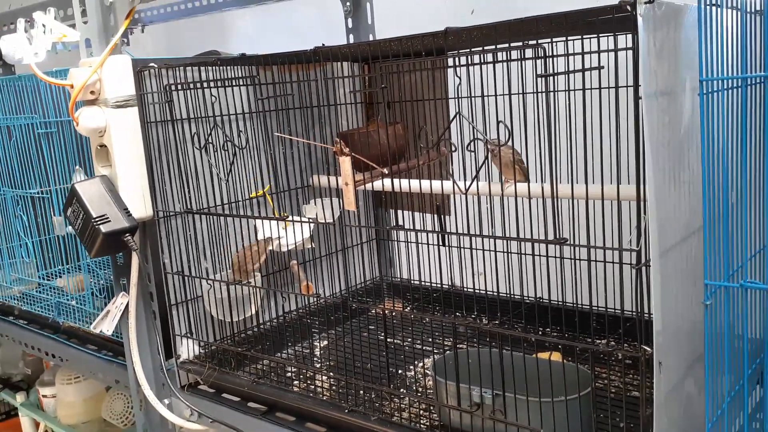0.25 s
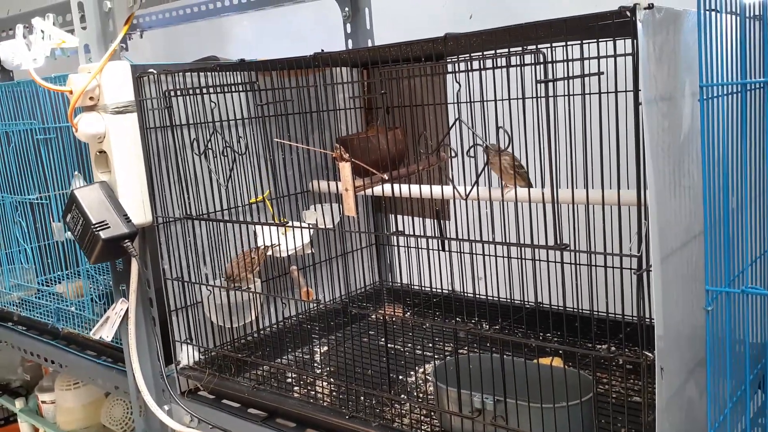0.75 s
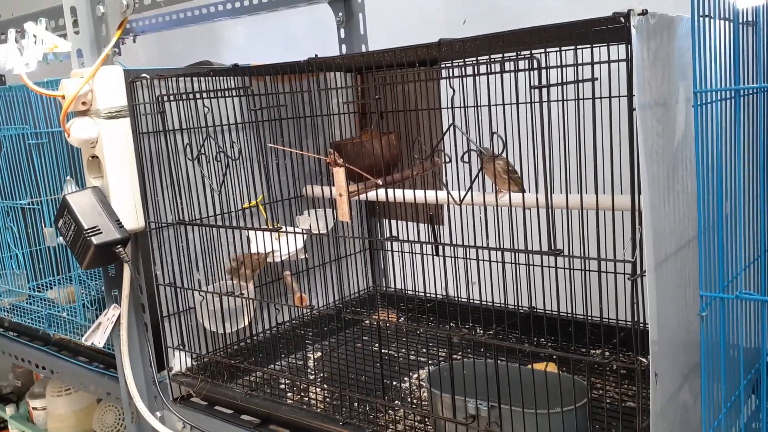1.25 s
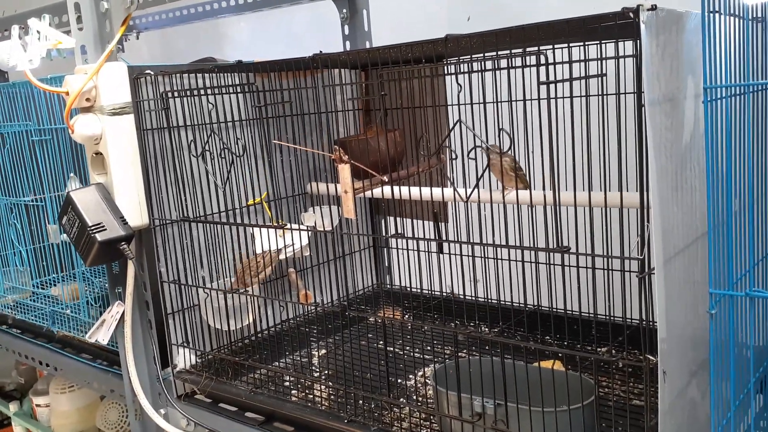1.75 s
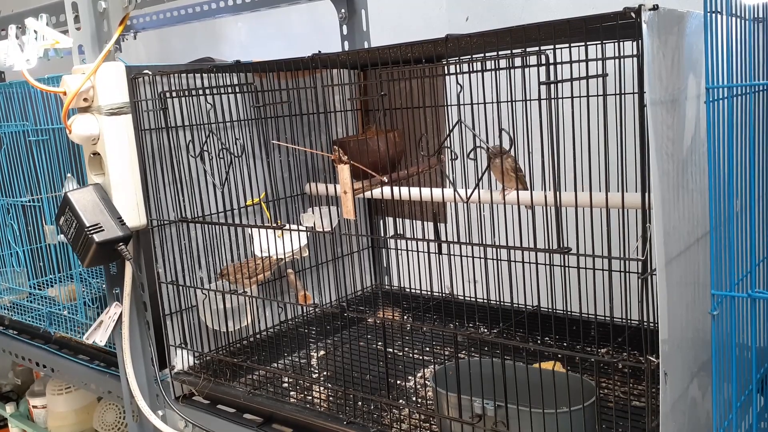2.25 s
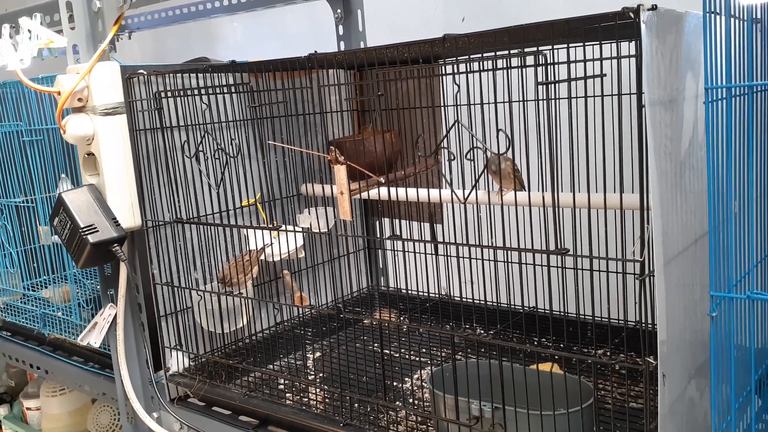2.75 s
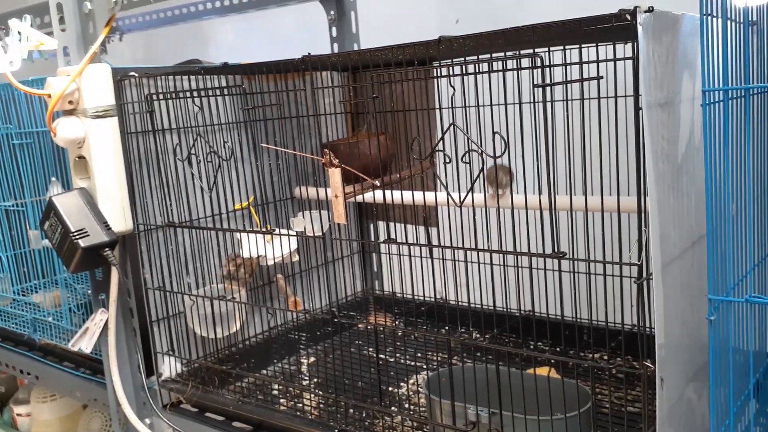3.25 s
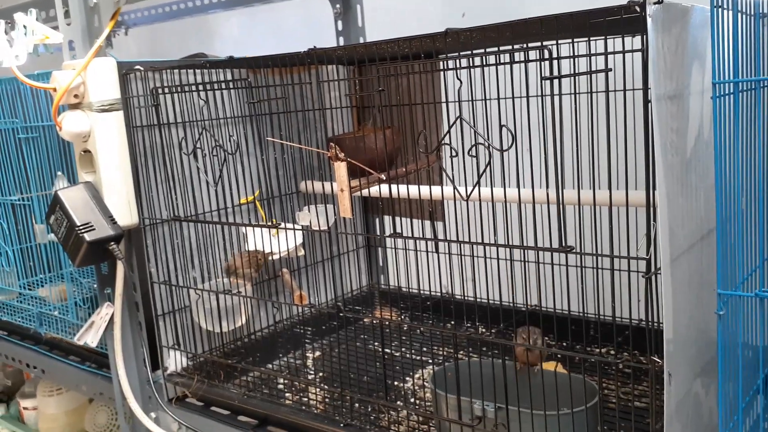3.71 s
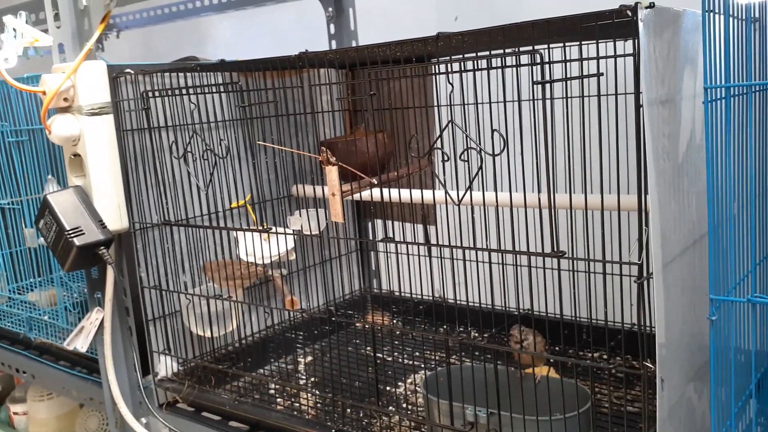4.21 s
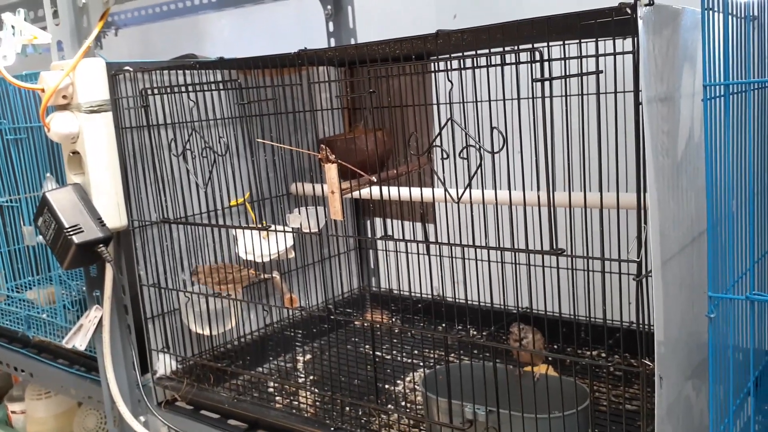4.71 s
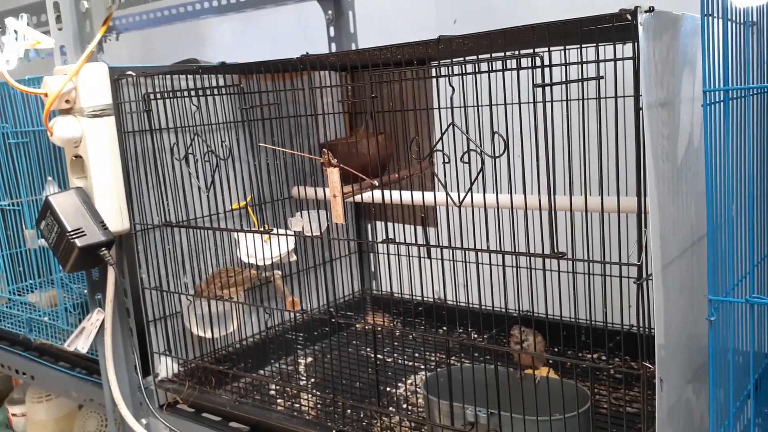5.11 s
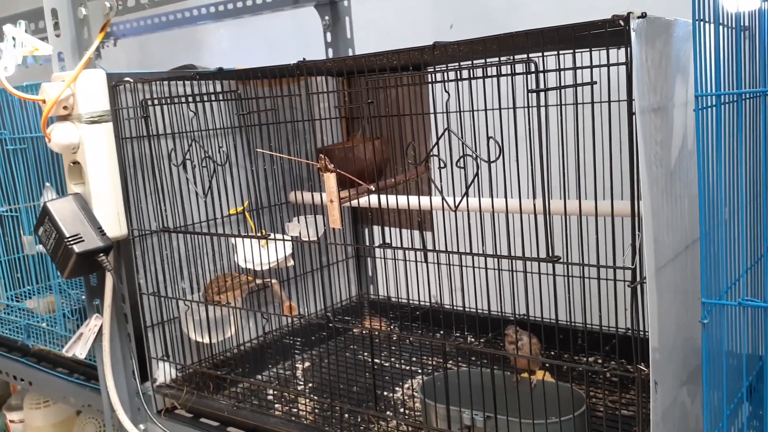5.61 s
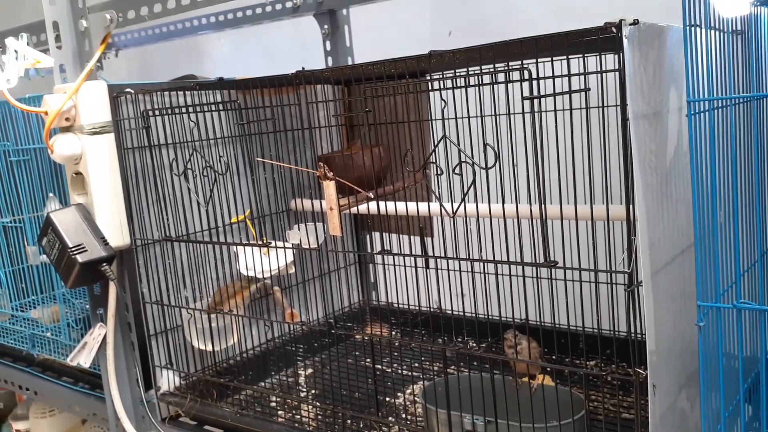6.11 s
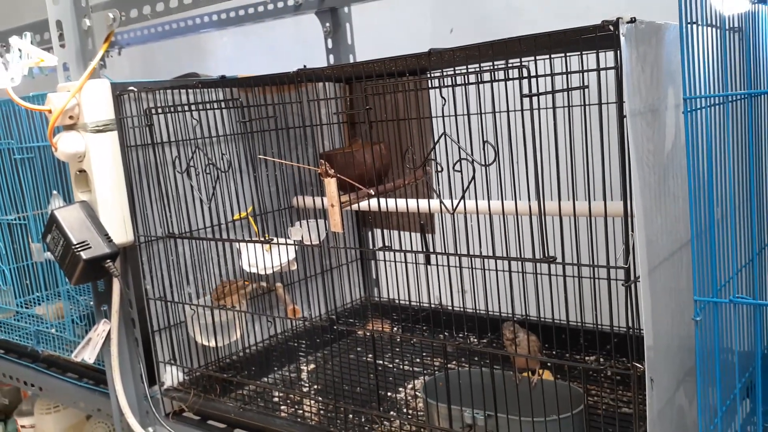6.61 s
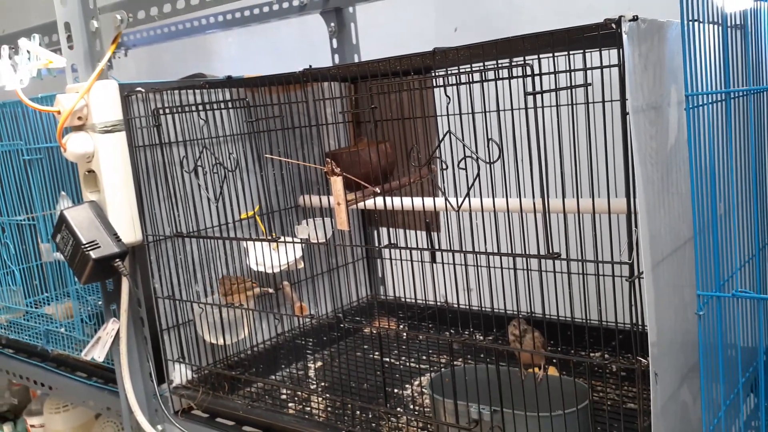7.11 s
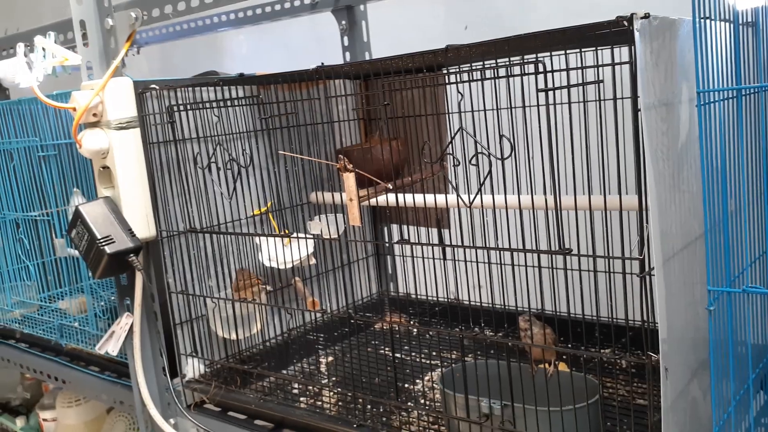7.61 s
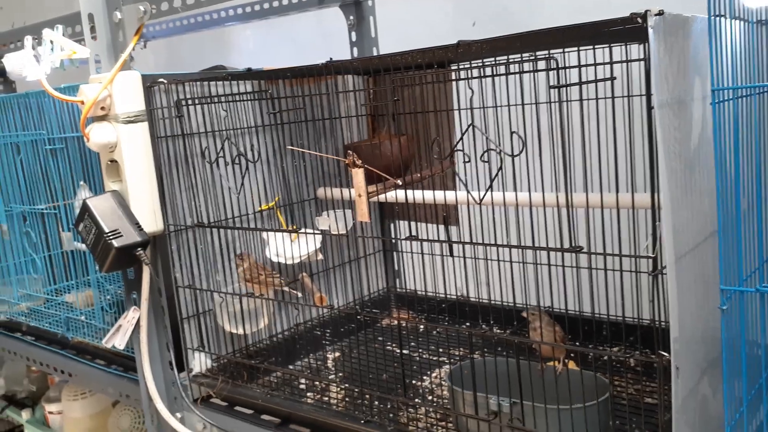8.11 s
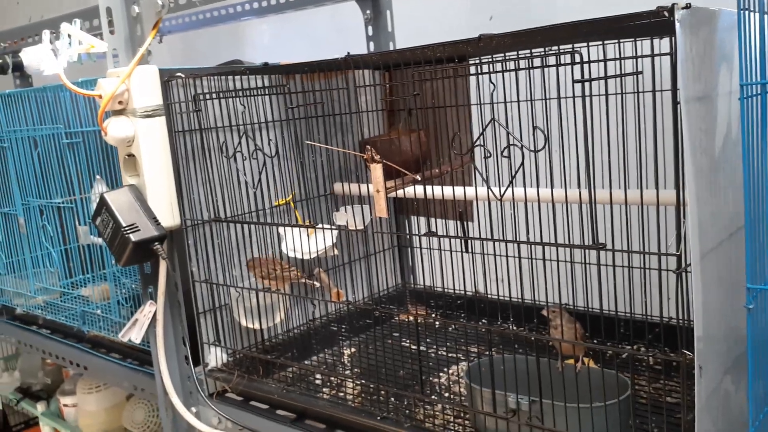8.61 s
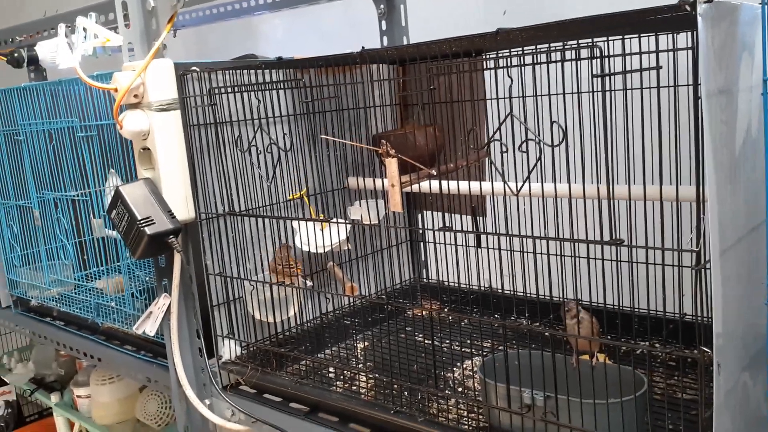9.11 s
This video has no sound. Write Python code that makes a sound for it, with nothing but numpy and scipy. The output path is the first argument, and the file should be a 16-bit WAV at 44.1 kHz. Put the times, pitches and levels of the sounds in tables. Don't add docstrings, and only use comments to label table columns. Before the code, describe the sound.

Clear gliding bird whistles and a fast high trill ring through a reverberant indoor aviary over distant chirps, husk rustles and soft low rumble.

```python
import sys
import numpy as np
from scipy import signal
from scipy.fft import rfft, irfft
from scipy.io import wavfile
from scipy.ndimage import uniform_filter1d

SR = 44100
rng = np.random.default_rng(int(sys.argv[2]) if len(sys.argv) > 2 else 0)


def generate_wav(signal):
    frames = np.transpose(np.atleast_2d(signal))
    scaled = np.clip(frames, -1, 1) * 32767
    pcm = np.round(scaled).astype(np.int16)
    wavfile.write(sys.argv[1], SR, pcm)


def level_to_linear(level):
    exponent = np.asarray(level, float) / 20
    return 10 ** exponent


N = 412335


def evened(x):
    return x / np.sqrt(np.mean(x ** 2) + 1e-20)


def read(points, hz):
    f, value = np.transpose(points)
    return np.interp(np.log(hz + 1), np.log(f + 1), value)


def add(mix, s, sound):
    at = round(s * SR)
    sound = sound[:, max(-at, 0):]
    part = mix[:, max(at, 0):][:, :sound.shape[1]]
    part += sound[:, :part.shape[1]]


def columns(rows):
    s, *cols = np.transpose(rows)
    t = np.arange(s[0], s[-1], 1 / SR)
    return s[0], [np.interp(t, s, c) for c in cols]


def wobble(count, step):
    return np.interp(np.arange(count) / step, np.arange(1400), rng.standard_normal(1400))


def whistle(hz, effort_db, second_db, third_db, fourth_db, husky, edge_s=0.0018):
    trembling_hz = hz * (1 + husky * wobble(len(hz), step=90))
    phase = 2 * np.pi * np.cumsum(trembling_hz) / SR
    tone = np.zeros(len(hz))
    for k, db in enumerate((0, second_db, third_db, fourth_db, fourth_db - 10.0), start=1):
        tone += level_to_linear(db) * np.sin(k * phase) * (k * hz < SR / np.e)
    ends = signal.windows.tukey(len(hz), min(2 * edge_s * SR / len(hz), 1))
    return np.sqrt(2) * level_to_linear(effort_db) * tone * ends


def shaped(shape, s, length, first, last, db):
    settle, peak, start_db, end_db, hold = shape
    u = np.linspace(0, 1, round(length * SR))
    hz = last * (first / last) ** ((1 - u) ** settle)
    rise_db = start_db * np.clip(1 - u / peak, 0, 1)
    fall_db = end_db * np.clip((u - peak) / (1 - peak), 0, 1) ** hold
    return s, (hz, db + rise_db + fall_db)


def piped(s, soft, full, hz, db):
    soft_db, jump_s, sharp, sag_db = db - 13.5, 0.019, 1.035, -6
    s, (pitch, effort_db) = columns([
        (s, sharp * hz, soft_db - 6.0),
        (s + soft / 2, np.sqrt(sharp) * hz, soft_db),
        (s + soft, 1.005 * hz, soft_db + 2.0),
        (s + soft + jump_s, hz, db),
        (s + soft + full, hz, db + sag_db)])
    pitch = pitch * (1 + 0.004 * wobble(len(pitch), step=550))
    return s, (pitch, effort_db + 3.0 * wobble(len(pitch), step=905))


# (left-right [dB], direct [dB], 2nd harmonic [dB], 3rd [dB], 4th [dB]); pipes have no direct column
FALL_VOICE = (3, -5.5, -15, -16, -20)
HOOK_VOICE = (2, -11.5, -40, -20, -33)
PIPE_VOICE = (3.5, -50, -27.5, -36)
# (glide settling exponent, peak [share of length], start [dB], end [dB], hold exponent)
FALL_SHAPE = (1.28, 0.8, -5, -9, 0.5)
HOOK_SHAPE = (9., 0.13, -10.5, -19, 1.7)
# (time [s], length [s], first pitch [Hz], last pitch [Hz], peak [dB], brightness [dB/harmonic])
FALLS = [
    (.345, 0.06, 4100, 2385, -35, -3.5),
    (1.339, 0.076, 4750, 2946, -47, -1),
    (2.75, 0.097, 4606, 2720, -37.5, 1.5),
    (5.665, .115, 4680, 2330, -34, 0.5),
    (7.56, 0.072, 3380, 2510, -36, -0.5),
]
HOOKS = [
    (2.35, .13, 2764, 3606, -26.5, 0.),
    (7.08, 0.13, 2680, 3693, -31, 0.),
]
# (time [s], soft part [s], full part [s], settled pitch [Hz], full level [dB], direct [dB])
PIPES = [
    (.775, 0.053, 0.13, 3468, -39, 11),
    (3.645, 0.041, 0.091, 3455, -26, -3),
    (8.585, .022, 0.127, 3479, -28, -2.5),
]
# (voice, curve of (time [s], pitch [Hz], effort [dB]))
SOLOS = [
    ((3, -4.5, -17.5, -9, -60), [(.473, 4330, -31), (.5, 4730, -24.5), (.56, 4714, -27), (.62, 4643, -33)]),
    ((3, -8, -23, -27.5, -25), [(2.165, 3406, -52), (2.2, 2824, -30), (2.24, 2155, -50)]),
    ((2, -8.5, -30, -26, -34.5), [(8.097, 4776, -27), (8.112, 4344, -18), (8.13, 3927, -20.5), (8.17, 3650, -18), (8.21, 3343, -24.5), (8.225, 2970, -30.5), (8.26, 1927, -47.5)]),
]


def near_calls(rooms):
    mix = np.zeros((2, N))
    near = [(voice, columns(rows)) for voice, rows in SOLOS]
    for voice, shape, rows in ((FALL_VOICE, FALL_SHAPE, FALLS), (HOOK_VOICE, HOOK_SHAPE, HOOKS)):
        for *row, bright_db in rows:
            harmonics_db = voice[2:] + bright_db * np.arange(1, 4)
            near.append(((*voice[:2], *harmonics_db), shaped(shape, *row)))
    for *row, direct_db in PIPES:
        near.append(((PIPE_VOICE[0], direct_db, *PIPE_VOICE[1:]), piped(*row)))
    for k, ((pan_db, direct_db, *harmonics_db), (s, (hz, db))) in enumerate(near):
        hz = uniform_filter1d(hz, size=400, mode="nearest")
        husky = 0.0012 + 0.0006 * SR * abs(np.gradient(np.log(hz)))
        tone = whistle(hz, db, *harmonics_db, husky, edge_s=0.009)
        add(mix, s, placed(tone, rooms[k % PLACES], pan_db, direct_db))
    return mix


# (time [s], length [s], top level [dB], base rate [1/s; notes come 1.5 times as fast], fall of each
# note [Hz])
OPENINGS = [
    (1.601, 0.72, -48, 17.4, 920),
    (3.755, 0.43, -51, 24.6, 410),
    (5.841, .57, -50, 18, 300),
    (7.813, 0.58, -47.5, 20.6, 670),
]
# (time [s], length [s], first level [dB], last level [dB], base rate [1/s; notes come 1.5 times as fast])
RUNS = [
    (2.347, 0.2, -56, -49.5, 18.7),
    (4.247, 1.45, -60.5, -60, 24.9),
    (5.743, 0.066, -39, -52, 18),
    (6.431, 0.6, -53, -57, 18),
    (7.141, 0.59, -58.5, -52, 18),
    (8.327, 1.26, -52, -65, 17.9),
]


def trill(rooms):
    rest_hz, arch_hz, arch_db, run_fall_hz = 5292, 182.5, 8, 424
    mix, parts = np.zeros((2, N)), []
    for s, length, db, base_rate, fall_hz in OPENINGS:
        arch = np.sin(np.pi * np.linspace(0, 1, round(length * SR)) ** 0.9) ** 0.73
        parts.append((s, db - arch_db * (1 - arch), rest_hz + arch_hz * arch, base_rate, fall_hz))
    for s, length, first_db, last_db, base_rate in RUNS:
        level_db = np.linspace(first_db, last_db, round(length * SR))
        parts.append((s, level_db, rest_hz, base_rate, run_fall_hz))
    for k, (s, db, hz, base_rate, fall_hz) in enumerate(parts):
        rate = base_rate * (1.5 + 0.2 * wobble(len(db), step=2700))
        u = np.cumsum(rate) / SR % 1
        tone = whistle(hz + fall_hz * (0.5 - u), db + 1.6, -20.0, -39.5, -60.0, husky=0.008)
        tone *= np.sin(np.pi * u) ** 1.8
        add(mix, s, placed(tone, rooms[k], pan_db=4.5, direct_db=-11))
    return mix


# (direct [dB], 2nd harmonic [dB], 3rd [dB], 4th [dB])
FAR_VOICE = (-10, -27.5, -26.5, -45)


def glide(length, first, last, db):
    u = np.linspace(0, 1, round(length * SR)) ** 0.97
    husky = 0.002 + 0.2 * abs(np.log(last / first))
    return whistle(first * (last / first) ** u, db, *FAR_VOICE[1:], husky, edge_s=0.012)


# (time [s],
# length [s], first pitch [Hz], last pitch [Hz], level [dB])
FAR_LEFT = [(-.08, 0.045, 6700, 3490, -46.5), (.66, 0.086, 5500, 5250, -57.5),
            (0.663, 0.051, 6260, 5200, -49), (5.555, .11, 5620, 7020, -59), (5.89, 0.08, 7000, 6750, -58),
            (6.354, 0.073, 7890, 5420, -55.5), (6.44, .12, 7900, 5800, -57),
            (6.725, 0.093, 5670, 6640, -61.5), (6.7, 0.18, 6500, 4600, -55.5),
            (7.18, 0.11, 5500, 4330, -47.5), (7.468, .18, 6720, 6620, -59),
            (7.53, 0.057, 13450, 10300, -54), (8.588, 0.073, 7600, 5870, -63.5),
            (8.829, 0.059, 7630, 5830, -55), (9.221, 0.055, 5090, 6570, -52.5),
            (3.15, 0.4, 5790, 5580, -79), (2.416, 0.043, 5800, 4910, -48.5)]
FAR_FALLS = [(.18, 0.1, 5010, 3704, -48), (1.913, 0.028, 2554, 2170, -47), (2.2, 0.035, 5600, 4240, -42.5),
             (2.043, .015, 4600, 3330, -51), (4.045, .04, 4600, 3200, -56), (2.8, .097, 2910, 2026, -52),
             (2.92, 0.025, 2260, 1594, -53), (2.95, 0.045, 4360, 2710, -42.5), (2.9, .04, 3600, 2610, -45),
             (5.48, 0.062, 5180, 4080, -57), (5.96, 0.049, 4220, 2950, -50),
             (6.2, 0.059, 2920, 2012, -50.5), (6.4, 0.088, 6660, 4390, -51), (6.49, .075, 5780, 4360, -46),
             (6.605, 0.0302, 3860, 2950, -46.5), (6.68, .05, 3696, 2917, -50),
             (6.82, .055, 5550, 4860, -48), (7.37, 0.079, 3815, 2974, -50), (7.6, 0.075, 3170, 2762, -41),
             (8.039, .087, 2510, 1810, -61), (8.321, 0.07, 5630, 4580, -44),
             (8.445, 0.045, 2480, 2060, -44), (8.63, .06, 4200, 5200, -46), (8.69, .06, 5290, 4210, -43.5),
             (9.02, .11, 3995, 2208, -53), (9.201, 0.096, 4230, 2920, -53), (9.31, 0.019, 2840, 2220, -43),
             (7.12, 0.058, 2670, 2300, -59.5)]
FAR_PEEPS = [(.11, 0.029, 2980, 2790, -56), (.652, 0.02, 2700, 3490, -38),
             (1.029, 0.131, 2374, 2200, -68.5), (1.2, .08, 2343, 2310, -70.5),
             (1.961, 0.063, 2690, 3210, -61), (3.225, 0.039, 4210, 4280, -54.5),
             (3.228, .06, 3655, 3554, -55), (3.35, 0.043, 4340, 4045, -53), (3.355, 0.059, 3584, 3526, -49),
             (3.5, 0.034, 2346, 3310, -47), (4.05, 0.04, 2605, 2864, -56), (6.14, 0.09, 3260, 3330, -54),
             (6.275, 0.08, 4300, 5050, -49), (6.87, 0.095, 1950, 2770, -61), (7.66, 0.072, 3430, 3960, -44),
             (7.675, 0.039, 3940, 4710, -44.5), (8.75, 0.095, 2650, 2476, -61),
             (8.97, .19, 3920, 3670, -57)]


def far_calls(rooms):
    mix, build_s = np.zeros((2, N)), 0.017
    far = rooms * np.clip(np.arange(rooms.shape[-1]) / SR / build_s, 0.1, 1)
    for pan_db, rows in ((8.5, FAR_LEFT), (2.5, FAR_FALLS), (1.8, FAR_PEEPS)):
        for k, (s, length, first, last, db) in enumerate(rows):
            tone = glide(length, first, last, db)
            add(mix, s, placed(tone, far[k % PLACES], pan_db, FAR_VOICE[0]))
    return mix


# (time [s], level [dB])
FLOCK = [(0, -66.5), (0.701, -51), (1.099, -75), (1.8, -101), (2.1, -73), (3.102, -84), (5.399, -121.5),
         (5.8, -51), (6.5, -63), (7.3, -59.5), (8, -63), (8.7, -61.5), (9.35, -58)]


def flock(rooms, count=360):
    dry = np.zeros((1, N))
    for s, pitch, bend in rng.random((count, 3)):
        hz = 2300.0 * 2 ** (1.1 * pitch)
        add(dry, s * N / SR, glide(0.06, hz * (1.3 + 0.3 * bend), hz, 0)[None])
    level_db = np.interp(np.arange(N) / SR, *np.transpose(FLOCK))
    return placed(dry[0] * level_to_linear(level_db), rooms[-1], pan_db=0.83, direct_db=-38.0)[:, :N]


# (time [s], level [dB], ring [Hz], ring width [Hz])
KNOCKS = [(1.57, -68, 905, 110), (3.537, -49.5, 860, 340), (3.82, -50.5, 910, 160), (3.825, -48, 1713, 70),
          (4.04, -51, 793, 160), (4.225, -52, 600, 90), (4.232, -50, 2060, 140), (4.268, -48.5, 594, 50),
          (4.26, -49.5, 2330, 230), (4.262, -47.5, 1400, 96), (4.39, -60, 1400, 90), (4.39, -60, 570, 60),
          (4.57, -48, 522, 45), (4.59, -57, 1660, 200), (4.68, -50.5, 390, 110), (4.68, -56, 1650, 110),
          (4.86, -51, 292, 94), (7.6, -52.5, 790, 200), (7.79, -52.5, 845, 240), (7.79, -54.5, 1140, 91),
          (8.09, -52.5, 484, 87), (2.86, -50, 122.3, 14), (2.86, -53, 264, 160), (6.88, -61, 82.4, 5.6),
          (8.17, -53, 97, 5.5)]


def knocks(rooms):
    mix, t = np.zeros((2, N)), np.arange(10000) / SR
    for k, (s, db, hz, width_hz) in enumerate(KNOCKS):
        scrape = rng.standard_normal(len(t)) * np.exp(-t / 0.064)
        mode = np.exp(-np.pi * width_hz * t) * np.sin(2 * np.pi * hz * t)
        ring = signal.fftconvolve(scrape, mode)[:len(t)]
        ring = level_to_linear(db) * ring / abs(ring).max()
        add(mix, s, placed(ring, rooms[k % PLACES], pan_db=1.5, direct_db=0.28))
    return mix


# (time [s], level [dB], width [octaves])
TICKS = [(.3264, -50, .9), (.4014, -49.5, 1.8), (1.909, -51.5, 1.8), (1.9693, -49.5, 2.1),
         (2.046, -55, 1.5), (3.5453, -50, 1.7), (3.8214, -54, 2.9), (4.6783, -67.5, 2), (5.2205, -59, 1.34),
         (6.0258, -65, 2.2), (6.0398, -41, 0.83), (6.107, -53, 1.6), (6.869, -55, 0.99), (6.9394, -56, 1.4),
         (7.7891, -39, 1.8), (9.2434, -53, 1.3)]


def ticks(rooms):
    mix, t, center_hz = np.zeros((2, N)), np.arange(10000) / SR, 5800
    hz = np.fft.rfftfreq(len(t), 1 / SR) + 1
    for k, (s, db, octaves) in enumerate(TICKS):
        shape = np.exp(-(np.log2(hz / center_hz) / octaves) ** 2)
        band = irfft(rfft(rng.standard_normal(len(t))) * shape)
        tick = level_to_linear(db + 3.0) * evened(band) * np.exp(-t / 0.0058)
        add(mix, s, placed(tick, rooms[k % PLACES], pan_db=3.3, direct_db=-7.5))
    return mix


# (peak time [s], level [dB], rise [s], t60 [s], brightness [dB/octave])
STIR = [
    (2.88, -52.5, 0.065, 0.79, 4.5),
    (3.83, -51, 0.039, 1.3, 2),
    (4.29, -46, 0.064, 0.74, -0.8),
    (4.702, -45.5, 0.064, 0.94, -1),
    (4.86, -50.5, .1, 0.74, 0.),
    (4.06, -55, .02, .8, 2.),
    (7.459, -62, 0.011, 0.57, 4.5),
    (7.63, -53, 0.24, 0.87, 4.5),
    (7.79, -52, .01, 2.2, 3),
]
# (frequency [Hz], level [dB/Hz])
HUSKS = [(150, -28), (450, -14), (1160, -19), (1500, -19.5), (3500, -18), (6500, -26.5), (15500, -42)]


def stir_power(hz, t):
    power = 0
    for s, db, rise, t60, tilt_db in STIR:
        fade_db = np.where(t < s, 20 * (t - s) / rise, -60 * (t - s) / t60)
        color_db = read(HUSKS, hz) - 7.0 + tilt_db * np.log2(hz / 1000 + 0.1)
        power = power + level_to_linear(2 * (db + fade_db)) * level_to_linear(2 * color_db)
    return power


HUM_HZ = 64.7
# (middle time [s], half length [s], level [dB])
SWELLS = [(0.21, 0.17, -54), (0.556, 0.12, -65), (.85, 0.075, -63), (1.065, 0.061, -66), (1.356, .12, -70),
          (1.795, .2, -74.5), (2.8, 0.079, -58.5), (3.19, 0.23, -55.5), (3.748, 0.096, -56),
          (4.207, 0.083, -63), (4.486, 0.13, -58), (4.79, 0.1, -57.5), (5.068, 0.12, -64.5),
          (5.61, 0.3, -60.5), (6.297, 0.1, -65), (6.61, 0.17, -63), (7.184, 0.39, -61), (7.855, 0.23, -56),
          (8.345, 0.11, -59.5), (8.718, 0.18, -62), (9.35, 0.089, -63)]


def hum():
    hz, t = HUM_HZ + 1.5 * wobble(N, step=6000), np.arange(0, N, 100) / SR
    level = level_to_linear(-88.5) + sum(level_to_linear(db) * np.exp(-((t - s) / half) ** 4) for s, half, db in SWELLS)
    tone = np.sqrt(2) * np.sin(2 * np.pi * np.cumsum(hz) / SR)
    return np.interp(np.arange(N) / SR, t, level) * tone


# (time [s], level [dB])
TRAFFIC = [(0, -66), (.1, -62), (1.3, -66), (2.34, -69), (2.55, -60.5), (2.66, -67.5), (2.87, -55.5),
           (3.3, -61.5), (4.37, -69.5), (4.8, -61.5), (6.1, -65), (6.3, -60.5), (6.93, -64.5), (7.7, -55.5),
           (8.33, -57.5), (8.5, -61.5), (9.11, -59.5), (9.35, -64)]
# (frequency [Hz], level [dB/Hz])
RUMBLE = [(15, -41), (28, -34), (48, -3), (69, -1), (98, -1.5), (210, -7.5), (494, -29.5), (900, -28),
          (1170, -34.5), (1980, -120)]


def rumble_power(hz, t):
    notch_db = 14.0 * np.exp(-((hz - HUM_HZ) / 28.0) ** 2)
    level_db = np.interp(t, *np.transpose(TRAFFIC))
    return level_to_linear(2 * level_db) * level_to_linear(2 * (1.0 + read(RUMBLE, hz) - notch_db))


# (frequency [Hz], level [dB/Hz])
AIR = [(180, -44.5), (300, -4), (535, -17.5), (4150, -25), (5230, -11), (5490, -32), (5770, -19.5),
       (6370, -26.5), (10600, -18.5), (15600, -39)]


def air_power(hz):
    return level_to_linear(2 * (-74.5 + read([(100, -66.5)] + AIR, hz)))


def hiss():
    return noise(lambda hz, t: 10 * np.log10(rumble_power(hz, t) + air_power(hz) + stir_power(hz, t)))


# (frequency [Hz], left-right likeness [0-1])
SAME = [(30, 0.92), (125, 0.85), (300, 0.93), (700, 0.17), (1500, 0.039), (15000, 0.02)]
# (frequency [Hz], left-right [dB])
LEAN = [(60, -5), (150, 4), (1000, 0.7), (10000, 7)]


def noise(field_db):
    frames, hz = N // 256 + 5, np.fft.rfftfreq(1024, 1 / SR)
    a, b, c, d, patches = rng.standard_normal((frames, 513, 5)).T
    patches = uniform_filter1d(patches, size=10, axis=0)
    patches = evened(uniform_filter1d(patches, size=14, axis=1))
    same = np.clip(read(SAME, hz), -1, 1)[:, None]
    left = a + 1j * b
    right = same * left + np.sqrt(1 - same ** 2) * (c + 1j * d)
    lean_db = read(LEAN, hz)[:, None] * np.array([0.5, -0.5])[:, None, None]
    level_db = field_db(hz[:, None], np.arange(frames) * 256 / SR)
    z = np.array([left, right]) * level_to_linear(level_db + 2.18 * patches + lean_db)
    return signal.istft(z, nperseg=1024, noverlap=768)[1][:, :N]


PLACES = 12
# (frequency [Hz], t60 [s])
ROOM = [(300, 0.9), (2000, 0.86), (3500, .55), (5000, 0.66), (8000, 0.7), (14000, 0.34)]


def tails():
    hz, t, z = signal.stft(rng.standard_normal((PLACES, 2, 36000)), SR, nperseg=256)
    tail = signal.istft(z * level_to_linear(-60 * t / read(ROOM, hz)[:, None]), SR, nperseg=256)[1]
    s = np.arange(tail.shape[-1]) / SR
    tail *= 1 + 0.45 * np.exp(-s / 0.089)
    tail *= np.clip(s / 0.0021 - 0.3, 0, 1)
    return tail / np.linalg.norm(tail, axis=2, keepdims=True)


def placed(x, tail, pan_db, direct_db):
    room = tail.copy()
    room[[0, 1], rng.integers(0, 20, 2)] = level_to_linear(direct_db)
    return level_to_linear([[pan_db / 2], [-pan_db / 2]]) * signal.fftconvolve(x[None], room, axes=1)


def scene():
    rooms = tails()
    birds = near_calls(rooms) + trill(rooms) + far_calls(rooms) + flock(rooms)
    return birds + knocks(rooms) + ticks(rooms) + hum() + hiss()


def masked(x):
    z = signal.stft(x, nperseg=2048, noverlap=1024)[2]
    power = uniform_filter1d((abs(z) ** 2).mean(0), size=12, axis=0)
    slope = level_to_linear(-2 * 0.25 * np.arange(200))
    spread = signal.fftconvolve(power, slope[:, None] / slope.sum(), axes=0)[:len(power)]
    margin_db = 10 * np.log10(abs(power) / (abs(spread) + 1e-30) + 1e-30) + 32.0
    return signal.istft(z * np.clip(margin_db / 3.0, 0, 1), nperseg=2048, noverlap=1024)[1][:, :N]


def low_pass(x):
    return signal.sosfilt(signal.butter(12, 15700, fs=SR, output="sos"), x)


def record(dry):
    edge = signal.firwin(511, 15690, window=("kaiser", 9), fs=SR)
    mix = signal.oaconvolve(masked(dry), edge[None], "same")
    return low_pass(mix)


dry = scene()
out = record(dry)
generate_wav(out)
```